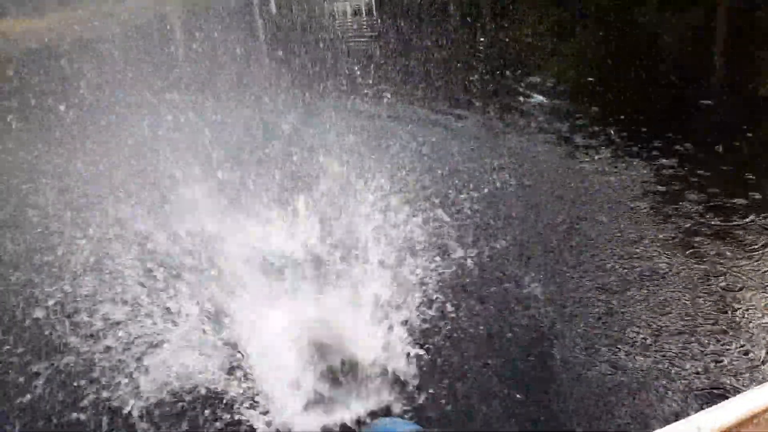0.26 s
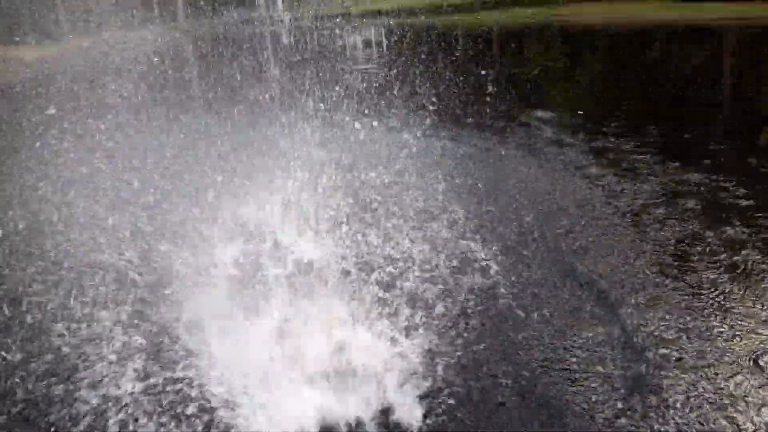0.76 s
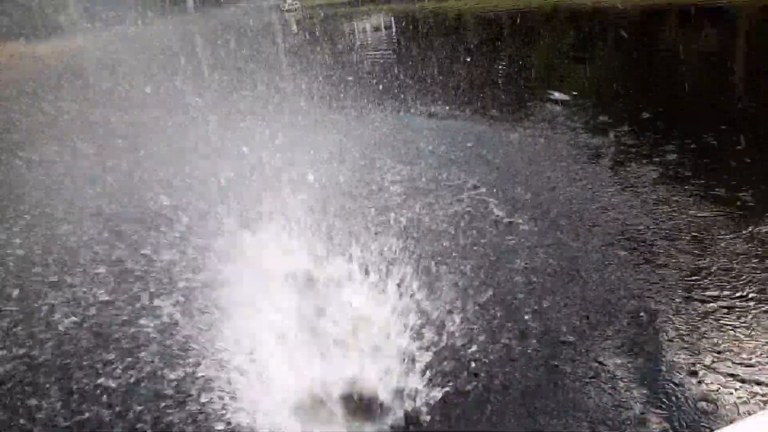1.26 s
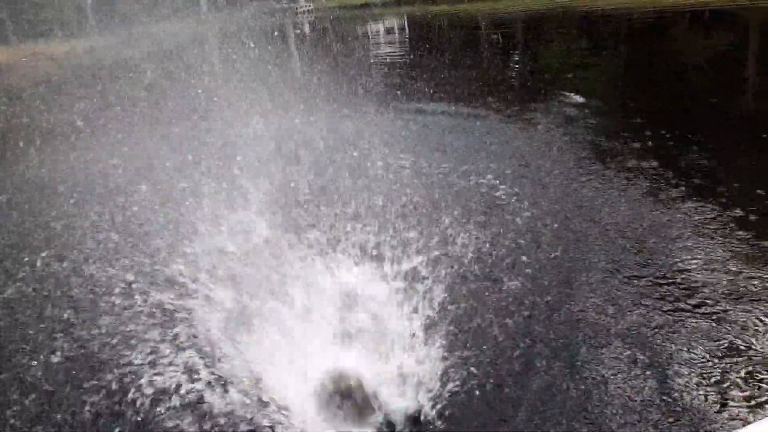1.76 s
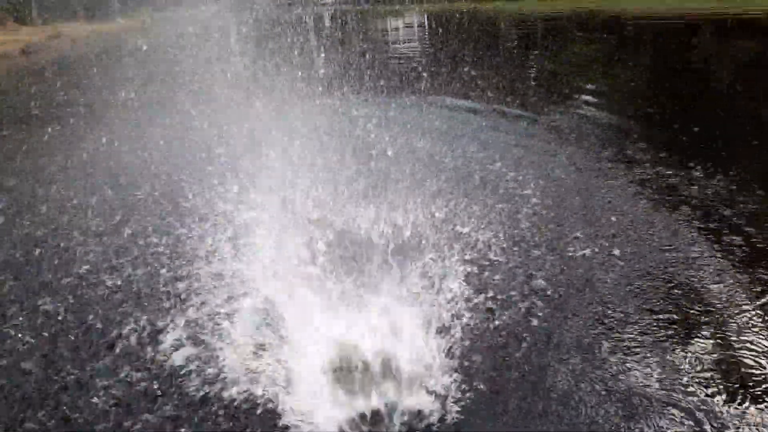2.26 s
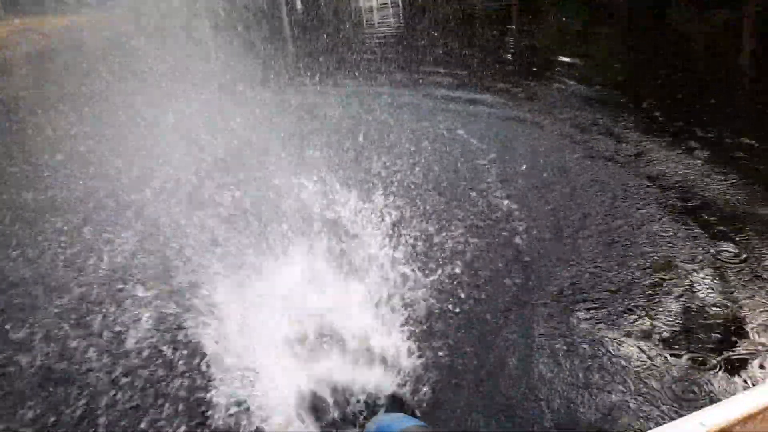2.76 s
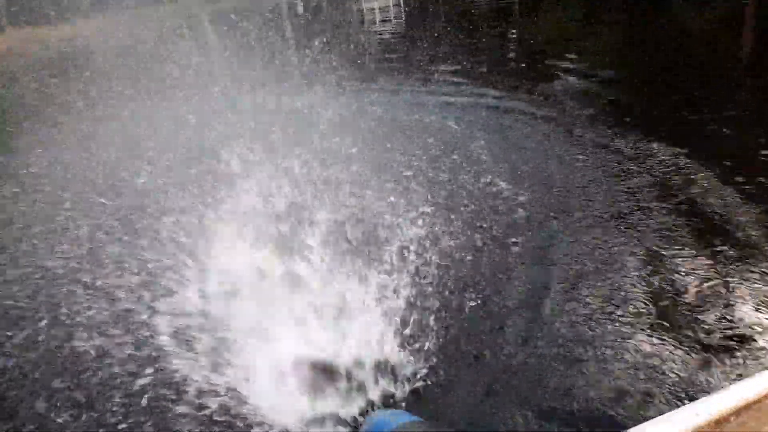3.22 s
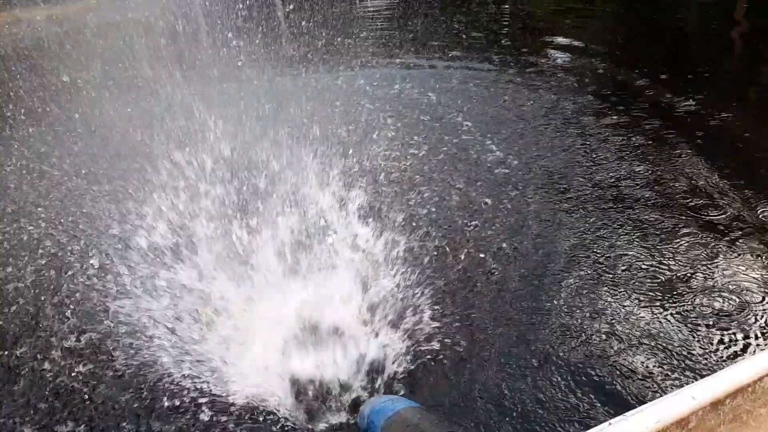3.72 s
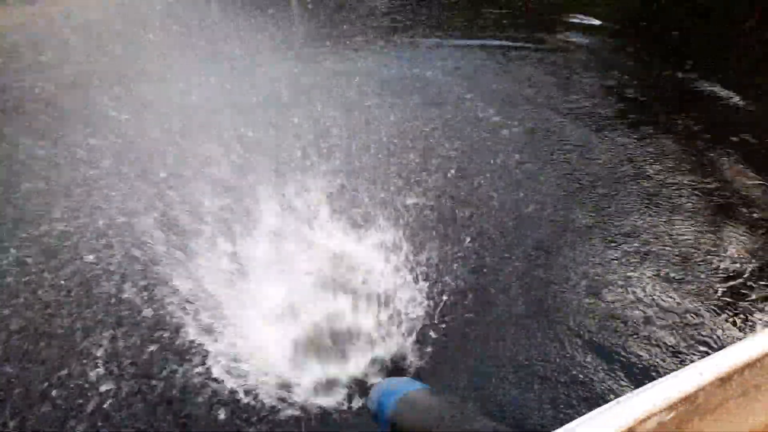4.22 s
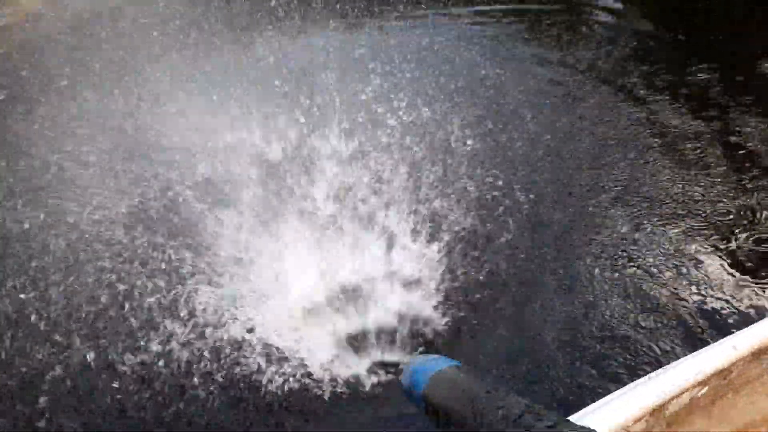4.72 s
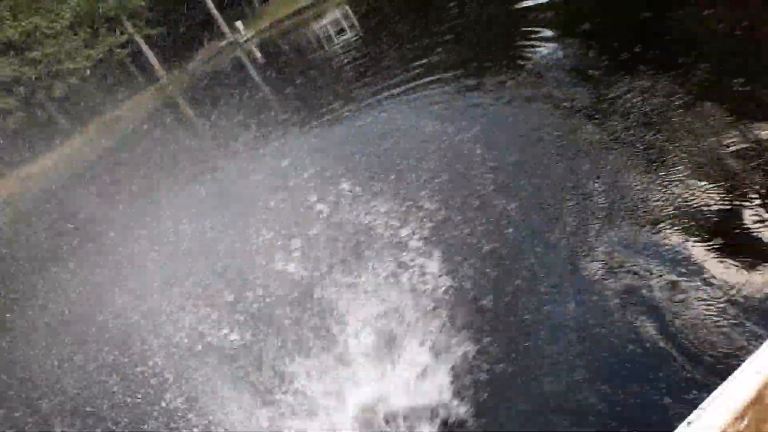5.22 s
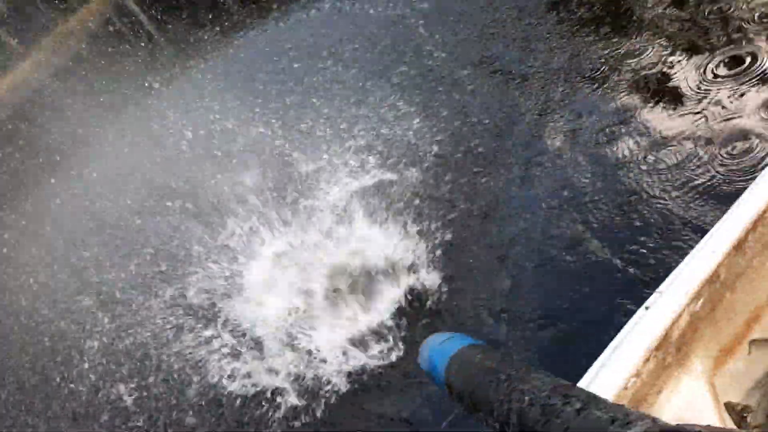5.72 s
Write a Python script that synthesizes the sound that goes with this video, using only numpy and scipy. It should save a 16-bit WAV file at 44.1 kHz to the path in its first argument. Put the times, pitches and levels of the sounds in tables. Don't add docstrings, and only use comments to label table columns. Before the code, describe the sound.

An electric pump in a small boat whines continuously, a piercing high tone above a mid-low hum, stronger on the right. A broad bright rush surrounds it, and a hose jet churns the pond with a roar and dense hiss. The whine flutters and dips briefly; near the end the bright pump noise eases and spray comes forward. Close handheld stereo microphone outdoors.

```python
import sys
import numpy as np
from scipy import signal
from scipy.fft import rfft, irfft, next_fast_len
from scipy.io import wavfile
from scipy.ndimage import uniform_filter1d, map_coordinates

SR = 44100
rng = np.random.default_rng(int(sys.argv[2]) if len(sys.argv) > 2 else 0)


def amplitude_ratio(level_db):
    exponent = np.asarray(level_db, float) / 20
    return 10 ** exponent


def put_to_file(sound):
    columns = np.atleast_2d(sound).T
    safe = np.clip(columns, -1, 1)
    whole_steps = np.round(safe * 32767)
    wavfile.write(sys.argv[1], SR, whole_steps.astype(np.int16))


N = 263718

# multiple of the vane rate, right level/dB, left-right level/dB, left lag/us
ROTOR_ORDERS = [(0.5, -51.7, -3.5, 672), (1, -24.2, -4.1, 393), (2, -37.6, -6.8, 336),
                (3, -45.8, -5.2, 242), (4, -29.1, -4.3, 350), (5, -39.7, -5.6, 312), (6, -31.4, -3.8, 371),
                (7, -41.6, -3.6, 359), (8, -21.1, -5.0, 365), (9, -41.5, -2.7, 350), (10, -38.4, -5.3, 405),
                (11, -40.0, -7.5, 414), (11.875, -42.7, -27.3, 422), (12, -11.9, -7.0, 419),
                (13, -38.8, -3.9, 410), (14, -39.9, -2.6, 366), (15, -39.6, -1.8, 291),
                (16, -38.6, 1.2, 351), (17, -44.0, -3.2, 311), (18, -33.2, -0.6, 346),
                (19, -47.8, 1.5, 357), (20, -49.9, -0.2, 348), (21, -54.3, 2.2, 349),
                (23, -49.6, -3.4, 357), (24, -44.5, -4.6, 353), (25, -52.7, -7.2, 337),
                (28, -54.3, -1.5, 347), (31, -46.9, -6.0, 356), (33, -52.2, -5.6, 355),
                (36, -51.8, 1.4, 349)]
# t/s, vane rate f/Hz
VANE_RATE = [(0, 377.13), (.45, 377.01), (.8, 377.06), (1.35, 376.93), (1.7, 376.98), (2.5, 376.63),
             (2.85, 376.89), (3.6, 376.47), (4.5, 376.34), (5.33, 376.4), (5.55, 376.16), (5.98, 375.98)]
STRONG_ORDERS = [1, 6, 8, 12]
ECHO_PASSES = {"hum": [(2.25, .4, -2), (4.5, .25, 2.3), (5.3, .3, 0.3)], "sixth": [(1.4, 0.11, -7),
               (2.15, .1, -6), (2.85, .25, 3.5), (3.63, .12, -10), (4.33, .1, -7), (5.05, .15, -5),
               (5.43, 0.1, -13)], "eighth": [(2.15, .12, -3), (5.05, 0.33, 1.5), (5.6, .12, 0.5)],
               "top": [(1.6, .45, -1.5), (2.12, .13, -6), (2.27, 0.11, -6), (2.5, 0.11, -1.5),
               (3.2, .12, -1.5), (4.78, 0.49, -2), (5.03, 0.044, 0), (5.52, 0.094, -3.5), (5.575, .04, -6),
               (5.75, 0.068, 2)]}
STRONG_SLIDE = [-0.23, -1.1, 0.12, 0.043]
STRONG_LIFT = [-0.13, 0.37, 0.18, 0.99]
STRONG_FLUTTER = [.9, 1.5, .7, .45]
STRONG_SWING = [5, 2, -6, 0.5]
SWING_S, SWING_LENGTH_S, SWING_LAG_US = 5.77, 0.092, -53
LEAN_DB_PER_S = 0.55
# t/s, width/s, change of the top tone's left lag/us
PORT_TILTS = [
    (.2, 0.55, 12),
    (1.5, .5, -2),
    (4.62, .22, 15),
    (5.1, .1, -20),
    (5.35, .2, -10),
]
ECHO_BEATS = {2: (-4, 7, 6.5, .3), 10: (-1, 4.5, 5.5, 4.2), 16: (-3, 6.5, 4.2, 4.3), 18: (-.5, 7, 4.9, 2.8)}
LAG_SLIDES = {1: 14, 2: -55}

# f/Hz, spectrum level/dB
LOW_RUSH = [(60, -44.5), (120, -26.5), (200, -16.5), (320, -8), (420, -10.5), (520, -17.5), (700, -10),
            (850, -11), (1350, -10.5), (1900, -5), (2500, -3), (4200, -3), (5000, -4.5), (5500, -120)]
# f/Hz, spectrum level/dB
HIGH_RUSH = [(5000, -120), (5500, -7.5), (5900, -1.5), (6500, 0), (7100, -2.5), (7600, -9.5), (8800, -11.5),
             (9600, -28), (10500, -15), (11500, -9.5), (12600, -12), (14300, -13), (16000, -13.5)]
# f/Hz, width/Hz, level/dB
RESONANCES = [(897, 70, 7.5), (1050, 100, 6), (1280, 67, 6.5), (1473, 32, 6.5), (1690, 260, 8),
              (2250, 88, 7), (2700, 190, 1.5), (2990, 130, 2), (3900, 160, 1), (9200, 300, 6),
              (13400, 260, 4)]
# f/Hz, width/Hz, level/dB
WHISTLE_RESONANCE = (11660, 200, 3)
# f/Hz, lag/us
PUMP_LAG = [(200, 170), (300, 170), (450, 363), (1100, 330), (1400, 270), (2000, 335), (3300, 355),
            (3800, 408), (5000, 412), (5800, 310), (7400, 340), (8300, 363), (12500, 346), (16000, 356)]
# f/Hz, left-right level/dB
PUMP_SHADOW = [(150, 0), (300, 0.5), (460, 1), (700, -2), (1000, -11.5), (1700, -7), (3000, -3),
               (5000, -5.5), (7500, 0.5), (11600, -6.5), (16000, -4)]
# t/s, share (0-1)
JET_FACING = [(0, .12), (.4, 0.01), (1.5, .07), (2, 0.26), (2.5, 0.2), (3.3, 0), (4, 0.13), (4.5, 0.01),
              (4.75, .5), (5, 0.06), (5.15, .7), (5.5, .55), (5.75, 1), (5.98, .75)]

# f/Hz, spectrum level/dB
CHURN_SPECTRUM = [(25, -28), (60, -28), (120, -27), (200, -11), (300, -7), (410, -2.5), (490, -33),
                  (540, -2.5), (610, -3.5), (850, -1), (1100, 0), (1400, -4.5), (2200, -33), (3500, -120)]
# f/Hz, spectrum level/dB
SPRAY_SPECTRUM = [(900, -120), (1400, -3.5), (2500, -4.5), (3300, 1), (4000, -3), (5200, -1.5), (6400, 1.5),
                  (7600, -7), (9500, -8), (11500, -6), (13000, -11.5), (16000, -13)]
# f/Hz, spectrum level/dB
MIST_SPECTRUM = [(4000, -120), (4300, -7), (4800, -5.5), (5250, 6), (5700, -10.5), (6100, -3), (6500, -120)]
# f/Hz, likeness (0-1)
COHERENCE = [(30, .88), (150, 0.45), (400, 0.7), (520, 0.43), (640, 0.7), (850, 0.91), (1100, 0.36),
             (2000, .1), (16000, 0.036)]
# t/s, width/s, level/dB
AIR_GULPS = [
    (.5, .08, 1.5),
    (.95, .1, 2),
    (1.85, 0.043, 4),
    (2.8, 0.081, 0.5),
    (3.4, 0.054, 0),
    (4.6, .12, 3),
    (5.85, .1, 1),
]
# t/s, width/s, level/dB
SPRAY_LULL = [
    (5.27, .16, -2.5),
    (5.85, .1, 0.5),
]
# t/s, width/s, level/dB
MIST_DRIFTS = [
    (.4, .15, -4),
    (1.7, .3, 2.5),
    (2.2, .2, -7),
    (3.3, 0.45, 2.5),
    (4.6, .35, 4),
    (4.98, .1, 3.5),
    (5.17, .1, -5),
    (5.68, .12, -6),
    (5.98, .1, -7),
]

RUSH_DB, BRIGHT_DB, CHURN_DB, SPRAY_DB, MIST_DB = -19.9, -23.5, -30.4, -23.5, -27
RUSH_TURN_DB, BRIGHT_TURN_DB, SPRAY_TURN_DB = -0.7, -8, 2.5
CHURN_SAG_DB_PER_S = -0.32


def unit(x):
    return x / np.sqrt(np.mean(x ** 2) + 1e-20)


def along(points, hz):
    f, v = np.transpose(points)
    return np.interp(np.log(hz + 1), np.log(f + 1), v)


def curve(points):
    s, v = np.transpose(points)
    return np.interp(np.arange(N) / SR, s, v)


def bumps(rows):
    t = np.arange(N) / SR
    return sum(height * np.exp(-((t - s) / width) ** 2) for s, width, height in rows)


def wobble(rate):
    knots = rng.standard_normal(int(N * 30 / SR) + 4)
    return map_coordinates(knots, [np.arange(N) * min(rate, 30) / SR])


def filtered(x, response):
    m = next_fast_len(N + SR // 2)
    return irfft(rfft(x, m) * response(np.fft.rfftfreq(m, 1 / SR)), m)[..., :N]


def patchy(patchy_db):
    z = signal.stft(rng.standard_normal((2, N)), nperseg=512)[2]
    field = rng.standard_normal(z.shape[1:])
    field = uniform_filter1d(field, size=5, axis=0)
    field = uniform_filter1d(field, size=10, axis=1)
    return signal.istft(z * amplitude_ratio(patchy_db * unit(field)), nperseg=512)[1][:, :N]


def spread(pair, spectrum, lead_us):
    def mixing(hz):
        angle = np.arccos(np.clip(along(COHERENCE, hz), -1, 1)) / 2
        return amplitude_ratio(along(spectrum, hz)) * [np.cos(angle), np.sin(angle)]

    def lead(hz):
        return np.exp(1j * np.pi * hz * lead_us * 1e-6 * np.array([[1], [-1]]))

    mid, side = filtered(pair, mixing)
    return unit(filtered(np.array([mid + side, mid - side]), lead))


def rotor_whine(turn):
    t = np.arange(N) / SR
    late = t - t.mean()
    swung = (1 + np.tanh((t - SWING_S) / SWING_LENGTH_S)) / 2
    settings = zip(ECHO_PASSES.values(), STRONG_SLIDE, STRONG_SWING)
    path_db = [bumps(rows) + slide * late + db * swung for rows, slide, db in settings]
    shake = 0.0072 * wobble(28)
    out = np.zeros((2, N))
    for k, db, side_db, lag_us in ROTOR_ORDERS:
        drift, sway = wobble(3.54), wobble(2.69)
        loose = np.clip((-31 - db) / 14, 0.05, 1)
        if k in STRONG_ORDERS:
            i = STRONG_ORDERS.index(k)
            db = db + STRONG_LIFT[i] + path_db[i] + STRONG_FLUTTER[i] * wobble(11)
            loose = 0.05
        if k == STRONG_ORDERS[-1]:
            side_db = side_db + LEAN_DB_PER_S * late + 0.18 * path_db[-1]
            lag_us = lag_us + SWING_LAG_US * swung + 2.0 * path_db[-1] + bumps(PORT_TILTS)
        if k in ECHO_BEATS:
            mean_db, beat_db, period, crest = ECHO_BEATS[k]
            beat = mean_db + beat_db * np.cos(2 * np.pi * (t - crest) / period)
            if k == 2:
                side_db, db, loose = side_db + 0.4 * beat, db + 0.4 * beat, 0.16 * loose
            else:
                db, loose = db + beat, 0.28 * loose
        lag_us = lag_us + LAG_SLIDES.get(k, 0) * late
        phase = k * (turn + shake) + rng.uniform(0, 2 * np.pi) + 0.41 * loose * drift
        lag = 2 * np.pi * k * VANE_RATE[0][1] * lag_us * 1e-6
        lag = lag + 0.15 * (1 + k / 12) * loose * sway
        size = np.sqrt(2) * amplitude_ratio(db + 4.4 * loose * drift)
        left = amplitude_ratio(side_db + 1.5 * loose * wobble(2.7)) * np.sin(phase - lag)
        out += size * np.array([left, np.sin(phase)])
    return out


def casing_rush(turn, facing):
    def rings(hz):
        modes = RESONANCES + [WHISTLE_RESONANCE]
        return amplitude_ratio(sum(db / (1 + (2 * (hz - f) / width) ** 2) for f, width, db in modes))

    def ports(hz):
        delay = np.exp(-2j * np.pi * hz * along(PUMP_LAG, hz) * 1e-6)
        return np.array([amplitude_ratio(along(PUMP_SHADOW, hz)) * delay, 1 + 0 * hz])

    low, high = patchy(patchy_db=0.88) * (1 + 0.39 * np.cos(turn))
    low = unit(filtered(low, lambda hz: amplitude_ratio(along(LOW_RUSH, hz)) * rings(hz) * ports(hz)))
    high = unit(filtered(high, lambda hz: amplitude_ratio(along(HIGH_RUSH, hz)) * rings(hz) * ports(hz)))
    low_gain = amplitude_ratio(RUSH_DB + RUSH_TURN_DB * facing)
    high_gain = amplitude_ratio(BRIGHT_DB + BRIGHT_TURN_DB * facing)
    return low_gain * low + high_gain * high


def jet_churn(surge):
    pair = patchy(patchy_db=3.5) + amplitude_ratio(-12) * bubbles(count=1500, hz=794, cycles=7.8)
    churn = spread(pair, CHURN_SPECTRUM, lead_us=150)
    sag = CHURN_SAG_DB_PER_S * np.arange(N) / SR
    level_db = CHURN_DB + sag + bumps(AIR_GULPS) + 1.2 * wobble(3.06) + 0.31 * surge
    return amplitude_ratio(level_db) * churn * amplitude_ratio([[0.3], [-0.3]])


def bubbles(count, hz, cycles):
    when, pitch, size, stream = rng.random((count, 4)).T
    t = np.arange(1200) / SR
    f = (hz * 1.6 ** (2 * pitch - 1))[:, None]
    age = f * t / cycles
    tone = np.sin(2 * np.pi * f * t * (1 + 0.14 * age))
    grains = amplitude_ratio(4.9 * size)[:, None] * age * np.exp(-3.5 * age) * tone
    length = N + len(t)
    starts = (when * N).astype(int) + (stream > 0.5) * length
    spots = starts[:, None] + np.arange(len(t))
    return unit(np.bincount(spots.ravel(), grains.ravel(), 2 * length).reshape(2, -1)[:, :N])


def falling_spray(surge, facing):
    spray = spread(patchy(patchy_db=2.0) * amplitude_ratio(0.27 * wobble(15)), SPRAY_SPECTRUM, lead_us=103)
    level_db = SPRAY_DB + SPRAY_TURN_DB * facing + bumps(SPRAY_LULL) + 0.24 * surge
    return amplitude_ratio(level_db) * spray * amplitude_ratio([[-0.6], [0.6]])


def mist():
    fizz = spread(patchy(patchy_db=0.1), MIST_SPECTRUM, lead_us=120)
    return amplitude_ratio(MIST_DB + bumps(MIST_DRIFTS)) * fizz * amplitude_ratio([[-0.6], [0.6]])


def scene():
    turn = 2 * np.pi * np.cumsum(curve(VANE_RATE)) / SR
    facing = curve(JET_FACING)
    surge = wobble(18.0)
    pump = rotor_whine(turn) + casing_rush(turn, facing)
    return pump + jet_churn(surge) + falling_spray(surge, facing) + mist()


def roll_off(x):
    return signal.sosfilt(signal.butter(12, 16080, fs=SR, output="sos"), x)


def record(dry):
    x = filtered(dry, lambda hz: hz < 15760)
    x = x / (1 + np.abs(x / 1.2) ** 6) ** (1 / 6)
    return roll_off(x)


dry = scene()
out = record(dry)
put_to_file(out)
```